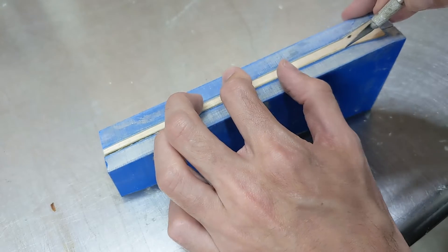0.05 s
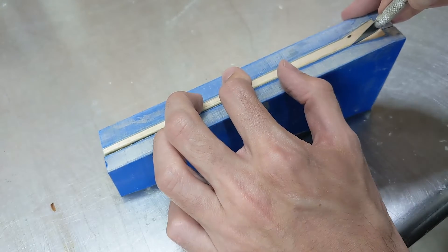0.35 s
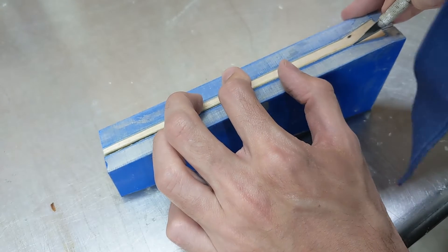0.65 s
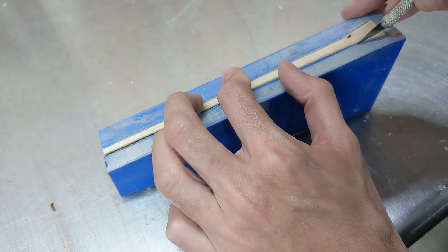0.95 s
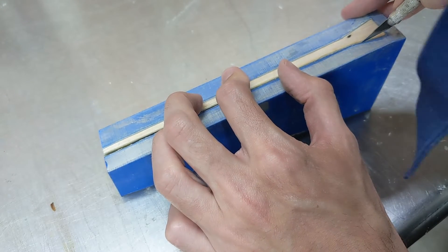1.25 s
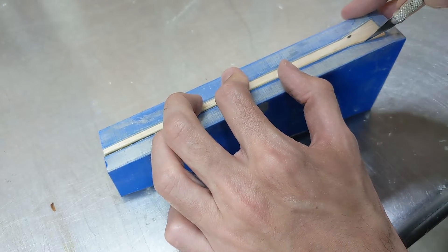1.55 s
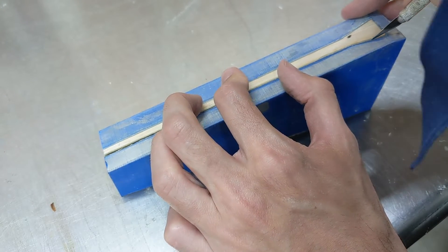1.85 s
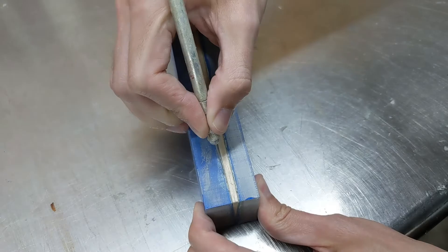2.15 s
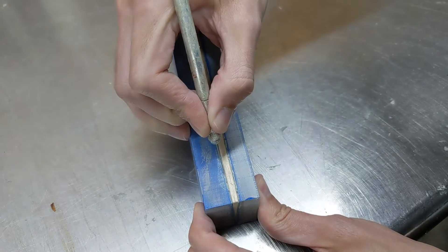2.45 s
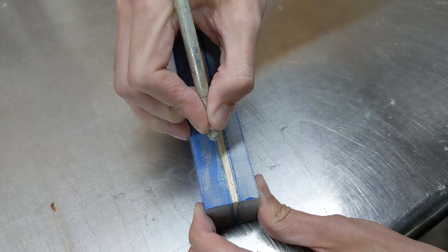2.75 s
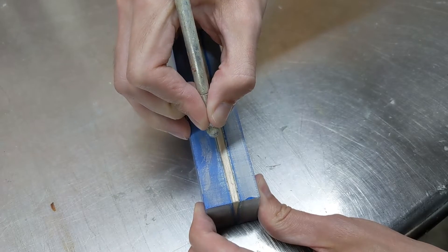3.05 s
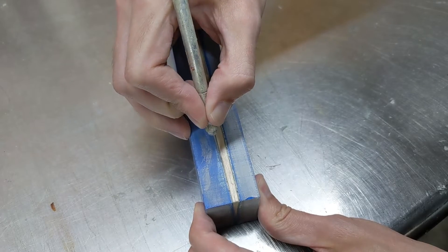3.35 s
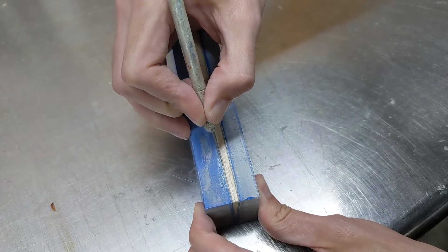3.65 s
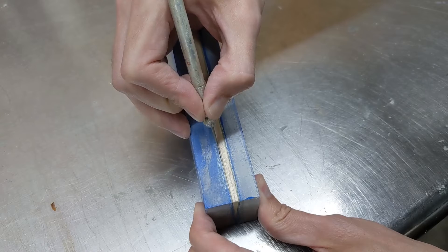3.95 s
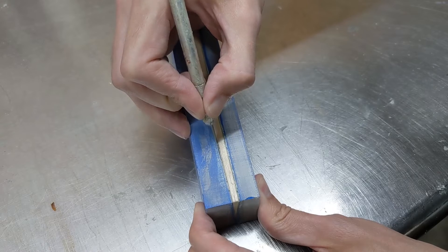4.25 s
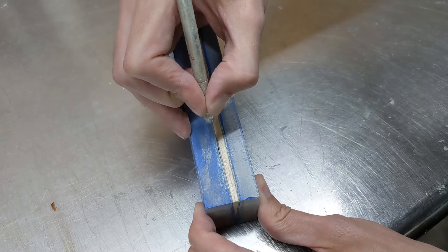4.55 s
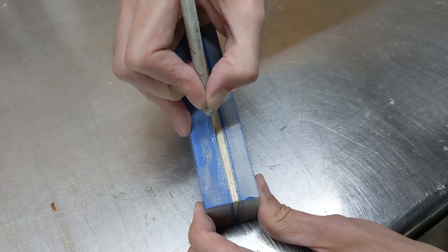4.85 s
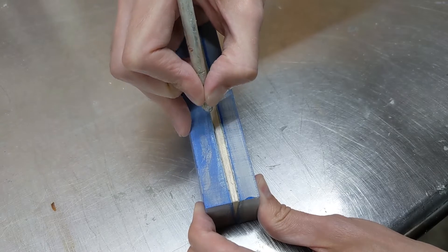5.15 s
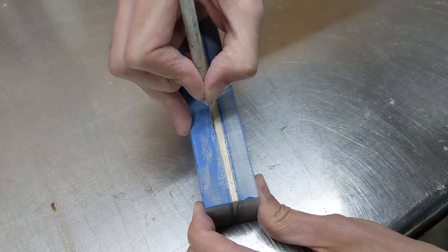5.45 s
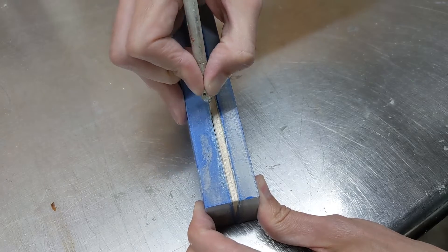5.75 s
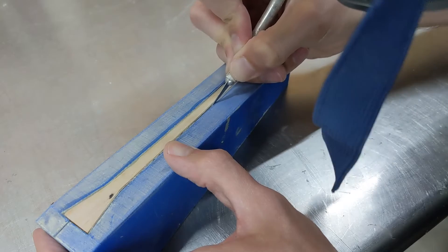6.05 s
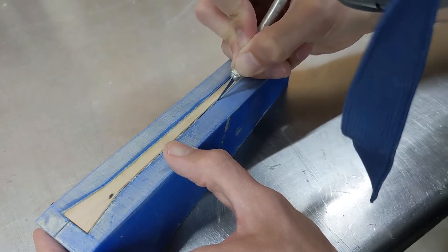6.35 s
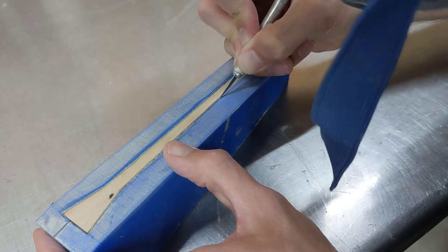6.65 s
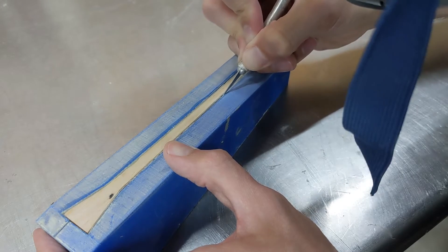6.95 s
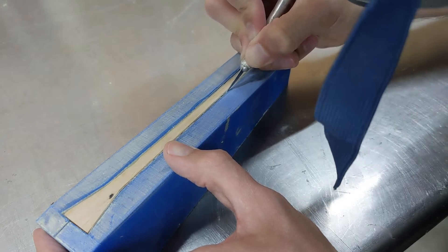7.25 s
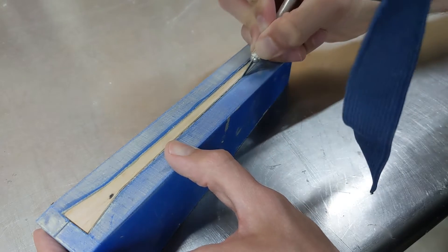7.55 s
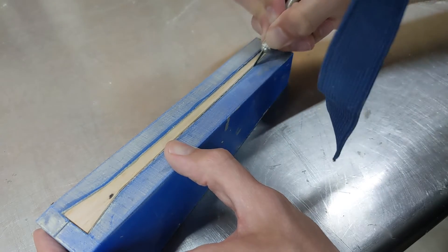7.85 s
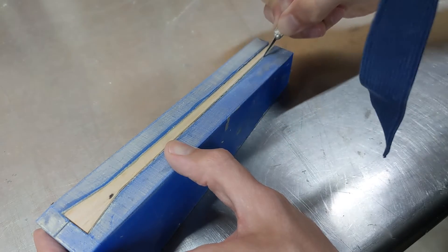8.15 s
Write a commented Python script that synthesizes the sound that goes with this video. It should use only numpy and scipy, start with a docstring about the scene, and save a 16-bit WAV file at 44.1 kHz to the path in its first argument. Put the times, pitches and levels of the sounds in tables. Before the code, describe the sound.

A hobby knife trims hardened fiberglass with sharp, brittle clicks and crackles, and faint scraping in between.

```python
"""Trimming fiberglass with a hobby knife

Hardened laminate gives way in brittle fractures along the seam of a mould held on a steel bench.
Each snap is a broadband impulse that excites the damped modes of the blade, the mould and the bench top.
The mould is held in three grips in turn, each weighting the modes differently. Between snaps come faint
blade friction and dull handling knocks; a small workshop reverberates over its steady air noise."""
import sys
import numpy as np
from scipy import signal
from scipy.fft import rfft, irfft, next_fast_len
from scipy.io import wavfile
from scipy.ndimage import map_coordinates

SR = 44100
rng = np.random.default_rng(int(sys.argv[2]) if len(sys.argv) > 2 else 0)


def file_out(sig):
    """Save sig as 16-bit WAV at sys.argv[1]."""
    # one column per channel
    cols = np.atleast_2d(sig).T
    # limit, then scale
    lim = np.clip(cols, -1, 1)
    pcm = np.round(lim * 32767).astype(np.int16)
    wavfile.write(sys.argv[1], SR, pcm)


N = 361179

USUAL_CRACK_DB = -37.5
# slopes for (blade, sparkle, mould, bench) [dB/dB]; the sparkle is the top octave of the crack
STRENGTH_SLOPES = (1.04, 0.96, 0.94, 0.88)   # a stronger break favours the light parts
RECOIL_SLOPES = (0.88, -0.61, 1.02, 1.56)   # a hard recoil is heavy and dull, a free snap bright
# transmission of each grip, relative to the crack: (sparkle [dB], mould [dB], bench [dB])
GRIP_SHARES = [(-1.5, -5, -6), (-1.5, -5.5, -1.07), (-3.5, -4, -12)]
# the blade rings most freely when upright and just entering the seam: (time [s], gain [dB])
BLADE_FREEDOM = [(1.9, -8), (2.34, 2.5), (3.4, 2), (5.3, -0.5), (5.7, -1.5), (6.02, -9.5)]
# breaks of the laminate: (time [s], crack level [dB], recoil above the usual for the grip [dB])
SNAPS = [(0.1266, -47.5, 7), (0.3841, -30, .5), (0.4139, -35.5, -9.5), (.463, -32.5, -11.5),
         (1.0692, -31, -9), (1.1246, -26, -8.5), (1.3302, -50.5, 2), (1.8964, -43.5, 0), (1.8999, -43, 5.5),
         (2.3432, -31, -4.5), (2.6955, -34, 3.5), (2.8401, -36, 4), (2.8922, -31, 1.5), (3.0692, -37, 5),
         (3.0965, -37, 3), (3.38, -28, -1), (3.5366, -68.5, 10), (3.6928, -39.5, 0), (3.6982, -35.5, -1),
         (3.7276, -35, 0.5), (3.7573, -44.5, 1.5), (3.7852, -40, 4.5), (3.9487, -51, -11.5),
         (3.9755, -37.5, -1), (3.9846, -32, -1), (4.0267, -31, -3), (4.0506, -34.5, -0.5),
         (4.3313, -38, 1.5), (4.5336, -33.5, 1.5), (4.658, -34.5, 1.5), (4.7856, -33, 1),
         (4.8138, -32.5, 1.5), (4.8465, -31, 1.5), (4.8691, -42, 1.5), (4.9047, -33.5, 0),
         (4.9253, -33.5, -0.5), (5.1064, -36, 0.5), (5.2023, -31, -1.5), (5.2124, -33.5, 3.5),
         (5.2474, -28, -2), (5.258, -41, 6.5), (5.3117, -32, -3), (5.3154, -32.5, -.5),
         (5.3691, -32.5, -2.5), (5.418, -43.5, 0.5), (5.6816, -41.5, 2.5), (5.6923, -49.5, -1.5),
         (6.024, -45.5, -5), (6.1486, -41.5, -7), (6.187, -54.5, -6), (6.206, -57.5, 0),
         (6.2793, -37.5, -7.5), (6.337, -38.5, -2), (6.4929, -59.5, -5), (6.5825, -37, -3.5),
         (6.6242, -49, 6.5), (6.6629, -40, 3), (6.8036, -55.5, -2), (6.892, -56, -2), (6.903, -36.5, 2),
         (6.9437, -33, 4), (6.971, -29, -3), (7.0069, -45.5, 4.5), (7.2412, -48, 2.5), (7.2758, -31, -3.5),
         (7.304, -36, 2), (7.3449, -41.5, 3.5), (7.3522, -33.5, -4), (7.3572, -38.5, 7.5),
         (7.3827, -26.5, -8), (7.3844, -21, 1), (7.3924, -17.5, 1.5), (7.9899, -49, -1),
         (8.1211, -53.5, -1)]
def snaps(grip):
    """Impulse excitation: the breaks of one grip, as direct sound and as sound sent into the room."""
    direct, spread = np.zeros((2, 2, N))
    # summed over all directions the crack loses its colour
    click = np.tile(signal.unit_impulse(256), (2, 1))
    even_crack, even_sparkle = unit(band(click, 2900, 9730)), unit(band(click, 7130, 16500))
    for s, crack_db, recoil_db in SNAPS:
        if grip_at(s) != grip:
            continue
        strength_db = USUAL_CRACK_DB + (crack_db - USUAL_CRACK_DB) * np.array(STRENGTH_SLOPES)
        push_db = strength_db + recoil_db * np.array(RECOIL_SLOPES)
        blade_db = push_db[0] + np.interp(s, *np.transpose(BLADE_FREEDOM))
        sparkle_db, mould_db, bench_db = push_db[1:] + GRIP_SHARES[grip]
        add(direct, crack(s, grip, crack_db, sparkle_db), s)
        add(spread, from_db(crack_db) * even_crack + from_db(sparkle_db) * even_sparkle, s)
        for direct_ring, spread_ring in ringing_parts(grip, blade_db, mould_db, bench_db):
            add(direct, direct_ring, s)
            add(spread, spread_ring, s)
    ticking = ticks(grip)
    return direct + ticking, spread + ticking


def fracture(decay_ms, size, lead_db, stereo_spread):
    """Brittle fracture: a leading click and a decaying rush of tiny ones as the fibres break."""
    rush = rng.standard_normal((3, size)) * from_db(5 * rng.standard_normal(size))
    rush *= np.exp(-np.arange(size) / SR * 1000 / decay_ms)
    shared = unit(rush[0])
    shared[0] += from_db(lead_db)
    return shared + stereo_spread * unit(rush[1:])


# broad resonances of laminate and knife, in the treble and in the top octave:
# (frequency [Hz], bandwidth [Hz], pan [dB], level in grip 1 [dB], in grip 2 [dB], in grip 3 [dB])
CRACK_RESONANCES = [(3340, 450, 6.5, 1.5, -5.5, -9), (3930, 230, 0, -8, 5.5, -7),
                    (5190, 850, -20.5, -10, -5.5, -16.5), (6030, 730, 4.5, 6.5, 4.5, -2.5),
                    (6720, 500, -2.5, 4, 0.5, -4), (7750, 190, -8.5, -5.5, -4, -4)]
SPARKLE_RESONANCES = [(8615, 810, -0.5, 4.5, 2.5, 2), (10580, 2400, -4, 6.8, 2, 0),
                      (13300, 2600, 0.5, 6.3, -7, -5), (15260, 750, 8, 10, 5, -3.5)]
# the side to which the cut faces: (time [s], left minus right [dB])
CUT_PAN = [(.46, -4), (1.1, -4), (3.4, -4), (4.0, -2.5), (6.6, -7), (6.94, 4), (7.33, -7), (7.38, 3.5)]
def crack(s, grip, crack_db, sparkle_db):
    """Source and filter: one fracture drives two banks of resonances and radiates to one side."""
    burst = fracture(decay_ms=1.42, size=900, lead_db=-3, stereo_spread=.55)
    snap = from_db(crack_db) * resonance_bank(burst, CRACK_RESONANCES, grip, plain_db=-4.5)
    snap += from_db(sparkle_db) * resonance_bank(burst, SPARKLE_RESONANCES, grip, plain_db=-2.5)
    snap *= panned(np.interp(s, *np.transpose(CUT_PAN)))
    return signal.fftconvolve(snap, loose_fibres(), axes=1)


def resonance_bank(burst, resonances, grip, plain_db):
    """Parallel resonators colour a burst; part of it passes with only its bandwidth limited."""
    coloured = unit(sum((-1) ** k * resonate(burst, hz, width) * from_db(levels[grip]) * panned(pan)
                        for k, (hz, width, pan, *levels) in enumerate(resonances)))
    low_hz, high_hz = resonances[0][0] - resonances[0][1], resonances[-1][0] + resonances[-1][1]
    return unit(coloured + from_db(plain_db) * unit(band(burst, low_hz, high_hz)))


def loose_fibres(size=1500, count=3, level_db=-27.5, mean_wait_s=0.0054):
    """Secondary fracture: an impulse train of the main break and a few weak, late releases."""
    train = signal.unit_impulse(size)
    delays_s = .002 + rng.exponential(mean_wait_s, count)
    when = np.clip(delays_s * SR, 0, size - 1).astype(int)
    train[when] += from_db(level_db + 4 * rng.standard_normal(count))
    return train[None]


# natural modes of the three bodies:
# (frequency [Hz], T60 [s], pan [dB], level in grip 1 [dB], in grip 2 [dB], in grip 3 [dB])
BLADE_MODES = [(1692, 0.012, 0.5, -6, -6.5, 0), (1974, 0.0081, 0.5, -1, 2.5, -14.5),
               (2162, 0.0099, -14.5, -15, 4, -9.5), (2450, 0.0077, -2, -10, -23.5, -3),
               (2480, 0.044, 9, -9, -20, -5.5), (2906, 0.025, -3, -4, -17.5, -6)]
MOULD_MODES = [(675, 0.032, -12.5, -12.5, 4, -2), (795.4, 0.043, 6.5, -4, 3, 8.5),
               (864, 0.012, 2, 2, -3.5, 5.5), (989, 0.032, 3.5, -1, 5, -3), (1141, 0.05, 8.5, -21, -10, 5),
               (1248, 0.018, 1, -5, 3.5, 7)]
BENCH_MODES = [(60, 0.44, 3.3, -23, -28, -24), (92, 0.38, 3, -8.5, -11, -20.5),
               (102.5, 0.59, 3.2, -12, -11, -16), (146.3, 0.34, 3.6, -16, -10, -23.5),
               (173.6, 0.36, 3, -8, -3.5, -12.5), (197, 0.036, 2.8, -4.5, -3, 1.5),
               (253, 0.21, 3.6, -1.5, -4, -8.5), (320.7, 0.15, 3, -7.5, -0.5, -9.5),
               (352.7, 0.11, 2.4, -6, -4.5, -7), (419.7, 0.091, 2, -2.5, 6, -9),
               (477, 0.042, 2.1, -6.5, -4, -1), (518, 0.048, 3, -19.5, -6.5, 7),
               (638, 0.13, 2, -13.5, -1, -7.5)]
def ringing_parts(grip, blade_db, mould_db, bench_db):
    """Free vibration: after a jolt the blade rings high, the mould lower and the bench top thumps."""
    blade = body(BLADE_MODES, grip, size=1600, scatter_db=2.5, detune=0.014, rise_ms=0.47,
                 dense_db=-9, dense_t60=0.017)
    mould = body(MOULD_MODES, grip, size=3000, scatter_db=-1, detune=0.019, rise_ms=0.52,
                 dense_db=-5, dense_t60=0.029)
    bench = body(BENCH_MODES, grip, size=12000, scatter_db=1.5, detune=0.03, rise_ms=0.26,
                 dense_db=-2, dense_t60=0.055)
    return from_db(blade_db) * blade, from_db(mould_db) * mould, from_db(bench_db) * bench


def body(modes, grip, size, scatter_db, detune, rise_ms, dense_db, dense_t60):
    """Directivity: strong modes stand out more in the direct sound than in what the room receives."""
    strong = strong_modes(modes, grip, size, scatter_db, detune, rise_ms)
    dense = dense_modes(modes, grip, size, dense_t60)
    elsewhere = dense_modes(modes, grip, size, dense_t60)   # other directions get another blend
    return np.array([unit(strong + from_db(dense_db) * dense), unit(strong / 2 + elsewhere)])


def strong_modes(modes, grip, size, scatter_db, detune, rise_ms):
    """Modal superposition: contact point and hand pressure vary each mode's sign, strength and pitch."""
    t, out = np.arange(size) / SR, 0
    for hz, t60, pan, *levels in modes:
        strength, shift, side = rng.standard_normal(3)
        ring = np.sin(2 * np.pi * hz * (1 + detune * shift) * t) * from_db(-60 * t / t60)
        out += np.sign(side) * from_db(levels[grip] + scatter_db * strength) * panned(pan) * ring
    return unit(out * (1 - np.exp(-t * 1000 / rise_ms)))


def dense_modes(modes, grip, size, t60):
    """Modal overlap: many weak modes merge into a short noise with the body's broad colour."""
    low_hz, high_hz = modes[0][0], modes[-1][0]
    colour = [(hz, levels[grip] * 0.57) for hz, _, _, *levels in modes]
    colour = [(low_hz * .6, -30)] + colour + [(high_hz * 1.35, -25), (high_hz * 4, -70)]
    t = np.arange(size) / SR
    envelope = from_db(-60 * t / t60) * (1 - np.exp(-t * high_hz * 1.35))   # rises in about one cycle
    mean_pan = np.mean([row[2] for row in modes])
    return unit(diffuse(colour, size)[0] * envelope * panned(mean_pan))


def ticks(grip, chance=.75, mean_delay_s=.018, fade_db_per_s=260, strays_per_s=2, stray_db=-74):
    """Acoustic emission: single fibres give after a snap; the resting tip also ticks at random."""
    tick = unit(band(fracture(decay_ms=0.8, size=900, lead_db=-5.5, stereo_spread=0.45), 2500, 15000))
    events, out = [], np.zeros((2, N))
    for s, crack_db, _ in SNAPS:
        draws, delays = rng.random(2), rng.exponential(mean_delay_s, 2)
        for draw, delay, relative_db in zip(draws, delays, rng.normal(-13, 2.5, 2)):
            if draw < chance:
                events.append((s + delay, crack_db + relative_db - fade_db_per_s * delay))
    strays = np.cumsum(rng.exponential(1, size=40)) / strays_per_s
    events += [(s, stray_db) for s in strays if s < N / SR]
    for s, level_db in events:
        if grip_at(s) == grip:
            add(out, from_db(level_db) * tick, s)
    return out


# modes stirred by handling: (frequency [Hz], T60 [s], level [dB])
KNOCK_MODES = [(362, 0.017, 2), (640, 0.05, -3.5), (785, 0.018, 3), (1060, 0.022, 3.5), (1277, 0.04, -9),
               (1650, 0.0036, 7), (2280, 0.032, -18.5)]
# dull, dry knocks close by: (time [s], level [dB])
KNOCKS = [(5.0353, -42.5), (5.8414, -31), (5.8542, -43.5), (5.8602, -35.5), (5.873, -45), (7.895, -52.5)]
def knocks(rise_s=0.00015):
    """Soft impact: a yielding contact excites only a few low, well damped modes."""
    out, t = np.zeros((2, N)), np.arange(3000) / SR
    for s, level_db in KNOCKS:
        ring = 0
        for k, (hz, t60, db) in enumerate(KNOCK_MODES):
            gain = (-1) ** k * from_db(db + rng.standard_normal())
            ring += gain * np.sin(2 * np.pi * hz * t) * from_db(-60 * t / t60)
        knock = unit(band(ring * (1 - np.exp(-t / rise_s)), 125, 3900))
        add(out, from_db(level_db) * knock * panned(1.0), s)
    return out


# friction spectra: (frequency [Hz], spectral density [dB])
RUB_SPECTRUM = [(240, -35), (400, 2.5), (446, -7), (510, -0.5), (769, 5), (1480, -10.5), (2000, -27.5),
                (2600, -41), (4400, -120)]
HISS_SPECTRUM = [(940, -36), (1600, -4), (2180, -10.5), (2770, -12), (4940, -10.5), (5390, -9.5),
                 (11200, -21), (14000, -20), (16000, -32)]
# strokes along the seam: (start [s], duration [s], rub level [dB], hiss level [dB])
STROKES = [(0.741, 0.059, -73, -72.5), (1.35, .12, -68.5, -72), (1.804, 0.082, -67, -76),
           (2.13, 0.011, -61, -74), (2.232, 0.28, -62, -72.5), (5.625, 0.067, -55, -54),
           (5.842, 0.045, -58, -62), (6.025, 0.3, -69, -72), (7.795, .36, -61, -64)]
def blade_drag(grit_db=-10, grit_per_s=160, rise_db_per_s=270, fall_db_per_s=241):
    """Sliding friction on resin: a dull rub, a hiss and tiny catches follow the blade's pressure."""
    t, rub_gain, hiss_gain = np.arange(N) / SR, 0, 0
    for s, length, rub_db, hiss_db in STROKES:
        # pressure builds before a stroke and eases after it
        pressure_db = np.minimum((t - s) * rise_db_per_s, (s + length - t) * fall_db_per_s)
        contact = from_db(np.clip(pressure_db, -100, 0))
        rub_gain += contact * from_db(rub_db)
        hiss_gain += contact * from_db(hiss_db)
    catches = (rng.random(N) < grit_per_s / SR) * from_db(4 * np.minimum(rng.exponential(1, N), 3))
    grain = fracture(decay_ms=0.94, size=400, lead_db=-19, stereo_spread=0.96)
    grit = signal.oaconvolve(catches[None], grain, axes=1)[:, :N]
    grit = from_db(grit_db) * unit(band(grit, 1500, 10000)) * np.sqrt(N)
    return rub_gain * diffuse(RUB_SPECTRUM, N) + hiss_gain * (diffuse(HISS_SPECTRUM, N) + grit)


def early_reflections(size, delay_s=0.00058, t60=0.084):
    """Scattering: the hands and the bench top return a short, bright cloud of echoes."""
    t = np.arange(size) / SR
    return unit(diffuse([(100, 2.5), (16000, -3.0)], size) * from_db(-60 * t / t60) * (t > delay_s))


# reverberation time of the workshop: (frequency [Hz], T60 [s])
ROOM_T60 = [(100, 1.1), (400, 0.47), (1000, 0.36), (2500, 0.41), (6000, 0.32), (15000, 0.1855)]
# colour of its reverberation: (frequency [Hz], level [dB])
ROOM_COLOUR = [(80, 4.5), (200, 8), (500, 9.5), (1100, 7.5), (2100, -1.5), (3200, -0.5), (5000, 2),
               (9000, 2.5), (15000, 1)]
def reverberation(size, onset_s=0.0046):
    """Exponential decay of a diffuse field: the room's impulse response, whose treble dies first."""
    t = np.arange(size) / SR
    noise = rfft(diffuse(ROOM_COLOUR, size))
    hz, out = np.fft.rfftfreq(size, 1 / SR), 0
    for band_hz, t60 in ROOM_T60:
        share = at_hz([(f, f == band_hz) for f, _ in ROOM_T60], hz)
        out += irfft(noise * share, size) * from_db(-60 * t / t60)
    return unit(out * (1 - np.exp(-(t / onset_s) ** 2)))


# background of the workshop: (frequency [Hz], spectral density [dB])
AIR_SPECTRUM = [(15, -37.5), (25, -5), (83, 4.5), (135, -1.5), (182, 0.5), (651, -9.5), (952, -10),
                (1390, -17), (2600, -18.5), (4020, -24.5), (6380, -23.5), (12200, -35), (15200, -41.5),
                (16500, -50.5)]
def room_air(level_db=-64.5):
    """Stationary noise: the still workshop has a faint floor, strongest in the bass."""
    return from_db(level_db) * diffuse(AIR_SPECTRUM, N) * panned(1.5)


# likeness of diffuse sound at the two microphones: (frequency [Hz], correlation [ratio])
COHERENCE = [(50, 0.6), (300, 0.79), (800, 0.37), (2000, 0.015), (5000, 0.13), (16000, 0.026)]
def diffuse(spectrum, size):
    """Spatial coherence: stereo noise of rms 1, alike in the bass and nearly unrelated in the treble."""
    padded = next_fast_len(size, True)
    hz = np.fft.rfftfreq(padded, 1 / SR)
    mid, side = rfft(rng.standard_normal((2, padded)))
    alike = at_hz(COHERENCE, hz)
    pair = np.sqrt(1 + alike) * mid + np.sqrt(1 - alike) * side * [[1], [-1]]
    noise = irfft(pair * from_db(at_hz(spectrum, hz)), padded)[:, :size]
    return unit(noise) * np.sqrt(size)


def from_db(db):
    """Decibels to amplitude ratio."""
    return 10 ** (np.asarray(db) / 20)


def unit(x):
    """Normalisation to a mean energy of one per channel."""
    return x / np.sqrt(np.mean(np.sum(x ** 2, axis=-1)) + 1e-20)


def at_hz(points, hz):
    """Interpolation on a log-frequency axis."""
    f, value = np.transpose(points)
    return np.interp(np.log(np.maximum(hz, 1)), np.log(f), value)


def panned(db):
    """Constant-power panning by a level difference, left minus right."""
    return unit(from_db(np.array([db, -db]) / 2))[:, None] * np.sqrt(2)


def band(x, low_hz, high_hz):
    """Causal band-pass with gentle slopes."""
    return signal.sosfilt(signal.butter(2, [low_hz, high_hz], "band", fs=SR, output="sos"), x)


def resonate(x, hz, width_hz):
    """Two-pole resonance with unit peak gain."""
    r = np.exp(-np.pi * width_hz / SR)
    feedback = [1, -2 * r * np.cos(2 * np.pi * hz / SR), r * r]
    return signal.lfilter(np.array([1, 0, -1]) * (1 - r * r) / 2, feedback, x)


def add(track, sound, s):
    """Superposition at time s; unit energy is scaled to that of rms 1 over 10 ms."""
    start = int(np.clip(round(s * SR), 0, N - 1))
    track[:, start:start + sound.shape[1]] += sound[:, :N - start] * np.sqrt(SR / 100)


def grip_at(s):
    """Index of the grip in use at time s."""
    return np.searchsorted([row[0] for row in GRIPS[1:]], s)


# holds on the mould: (start [s], reverberation [dB], early reflections [dB], left-channel lag [ms])
GRIPS = [(0, -14.5, -10, 0.11), (2.14, -16, -12, 0.1), (5.88, -15.5, -9, 0.11)]
def scene():
    """Linear superposition: snaps and their room response, knocks, blade friction and room air."""
    work = np.zeros((2, N))
    for grip, (_, room_db, early_db, lag_ms) in enumerate(GRIPS):
        direct, spread = snaps(grip)
        # the work lies a little nearer to the right microphone
        direct[0] = map_coordinates(direct[0], [np.arange(N) - lag_ms * SR / 1000], order=5)
        # each grip has its own pattern of reflections
        response = from_db(room_db) * reverberation(size=32768)
        response += from_db(early_db) * early_reflections(size=32768)
        work += direct + signal.oaconvolve(spread, response, axes=1)[:, :N]
    work = signal.sosfilt(signal.butter(2, 62, "high", fs=SR, output="sos"), work)
    return work + blade_drag() + room_air() + knocks()


def record(dry):
    """Band limiting: a steep elliptic low-pass at 16.5 kHz."""
    return signal.sosfilt(signal.ellip(10, .2, 70, 16500, fs=SR, output="sos"), dry)


dry = scene()
out = record(dry)
file_out(out)
```